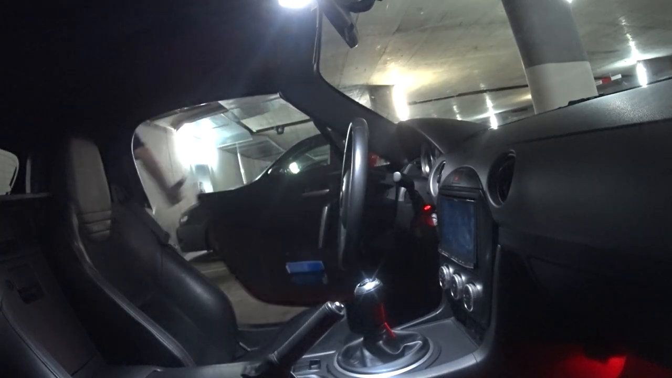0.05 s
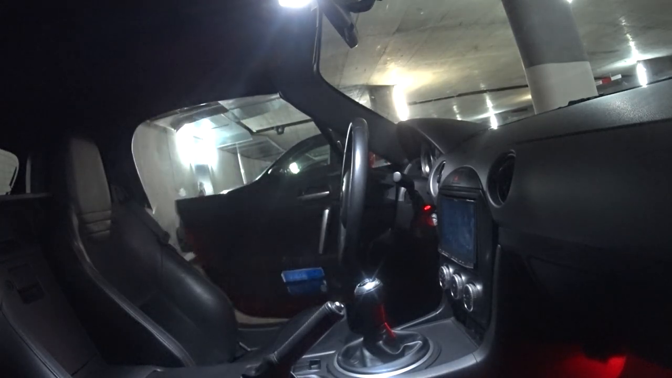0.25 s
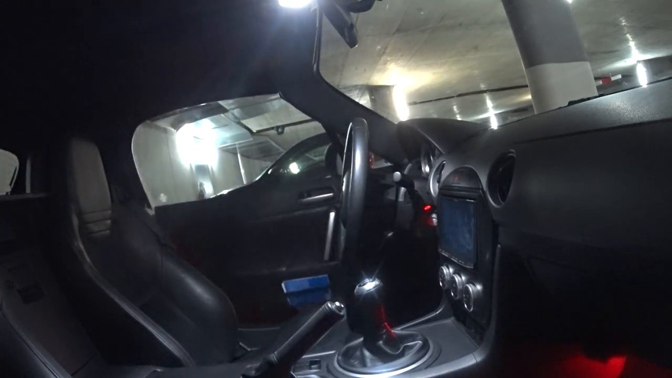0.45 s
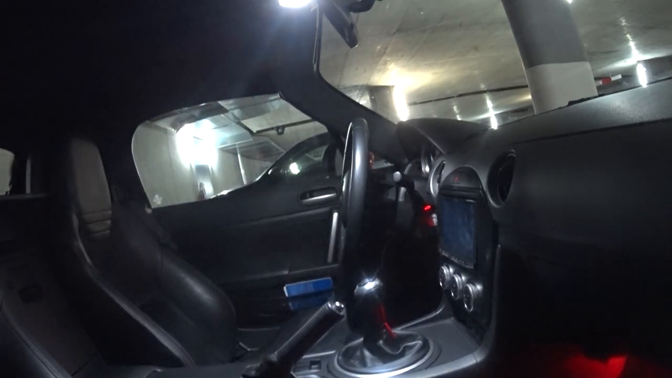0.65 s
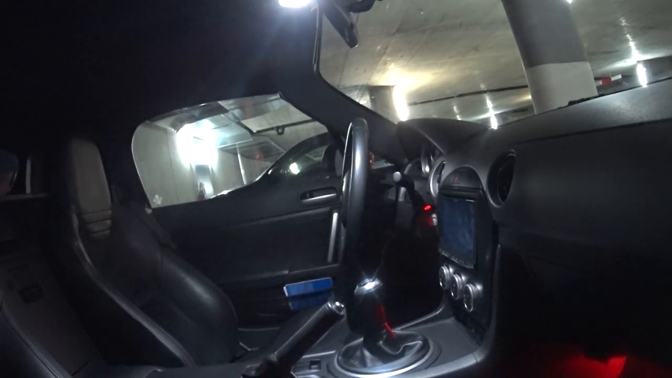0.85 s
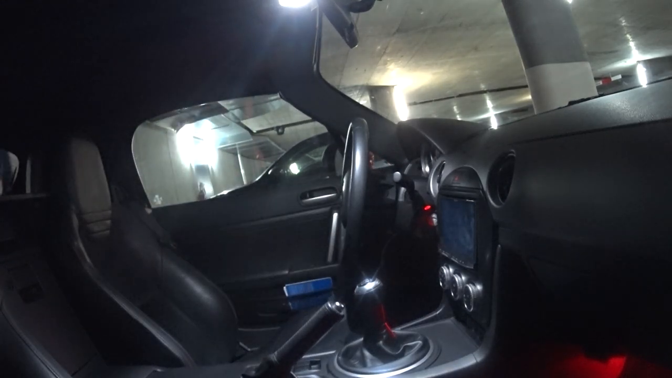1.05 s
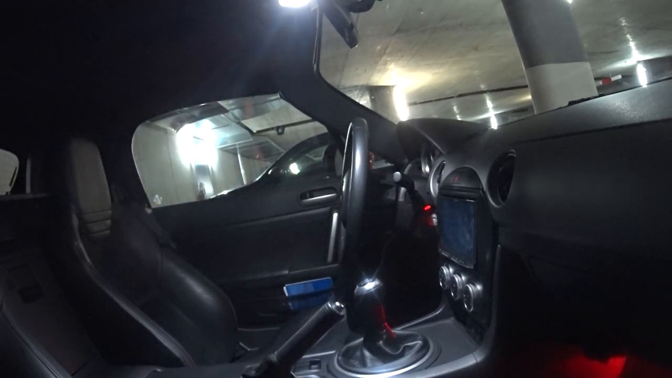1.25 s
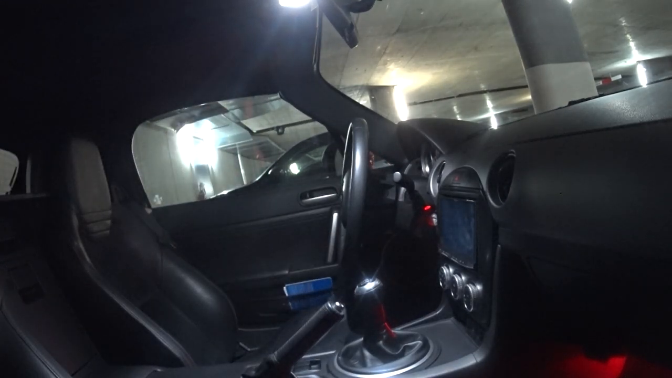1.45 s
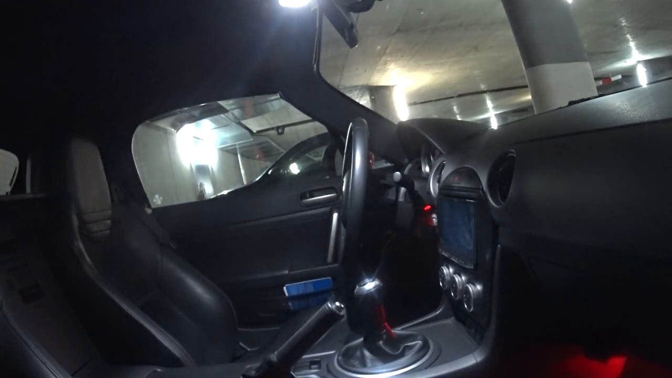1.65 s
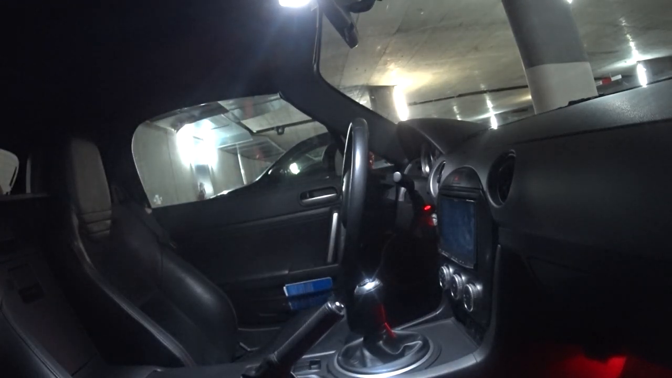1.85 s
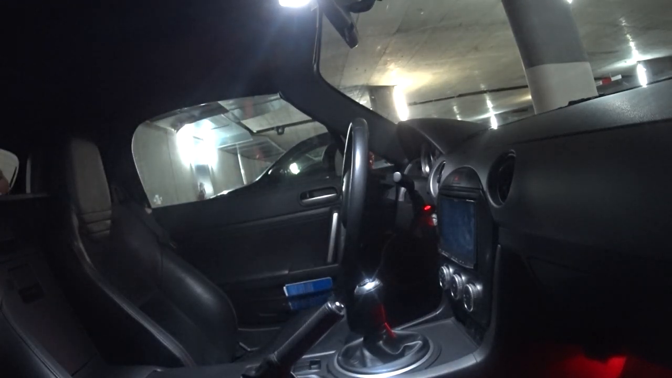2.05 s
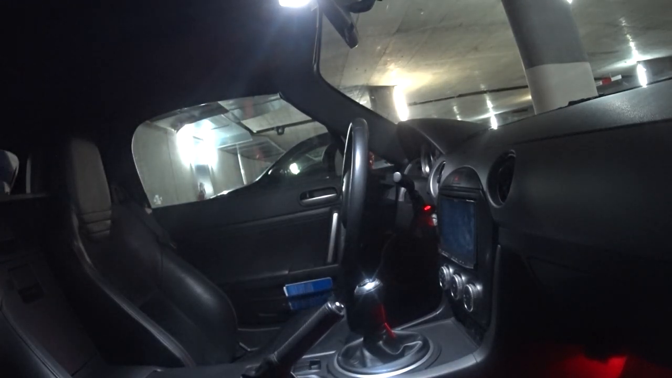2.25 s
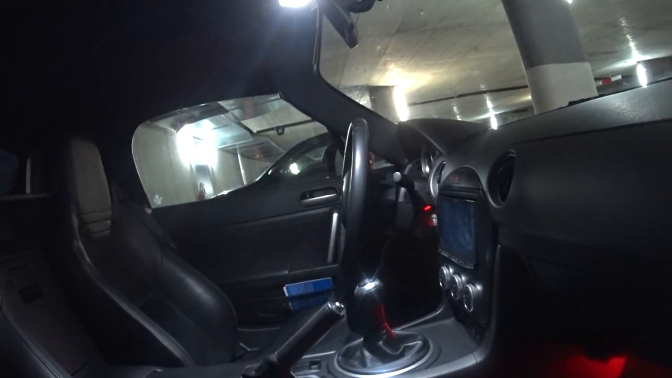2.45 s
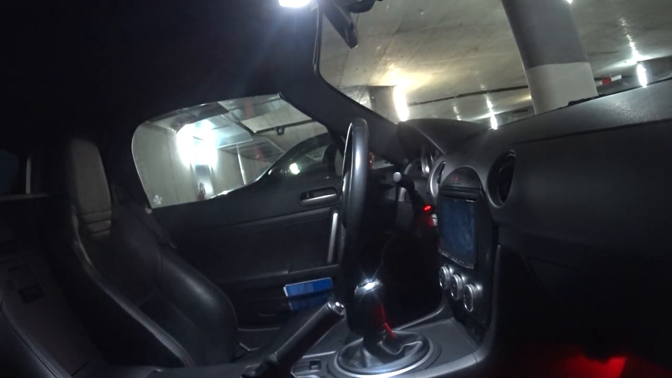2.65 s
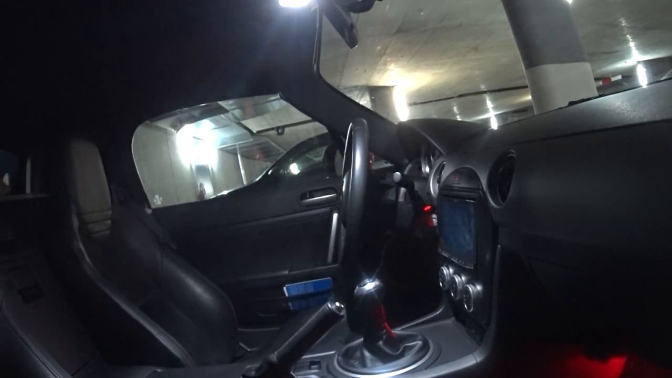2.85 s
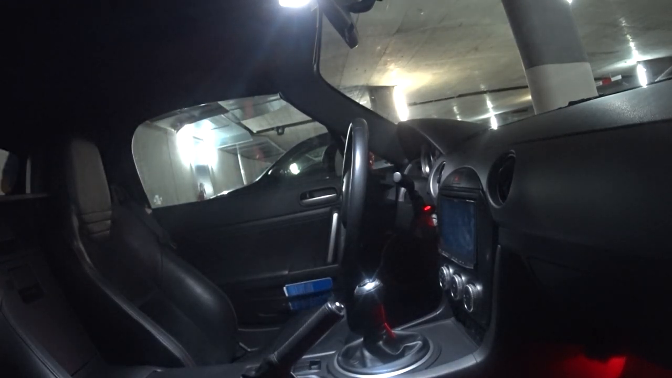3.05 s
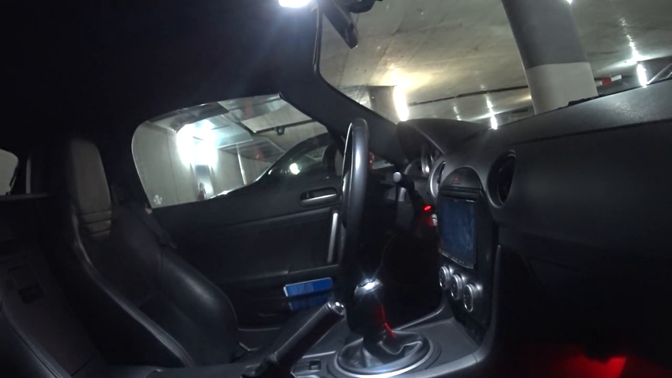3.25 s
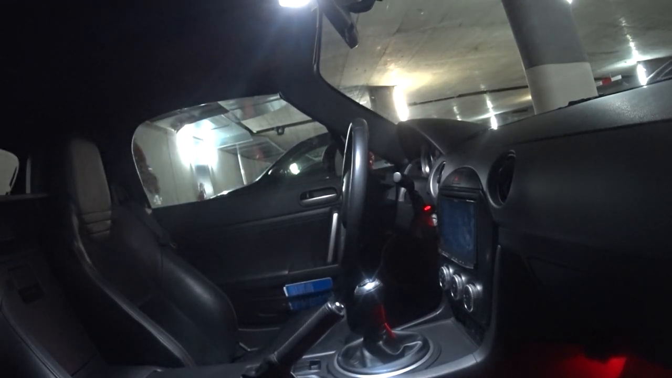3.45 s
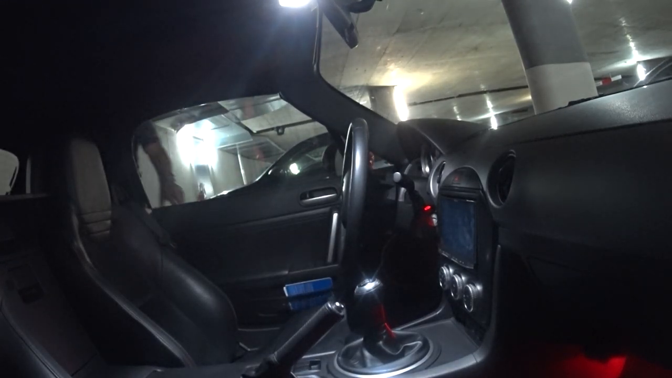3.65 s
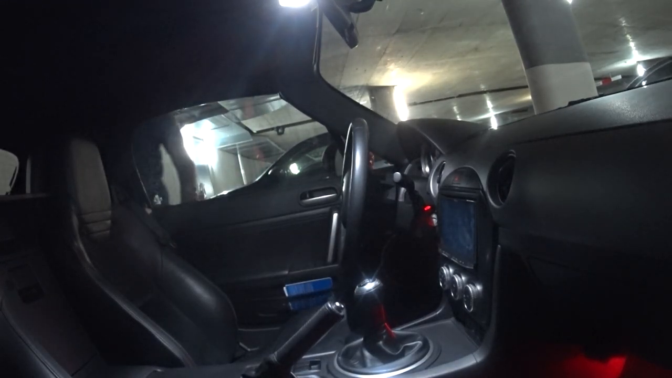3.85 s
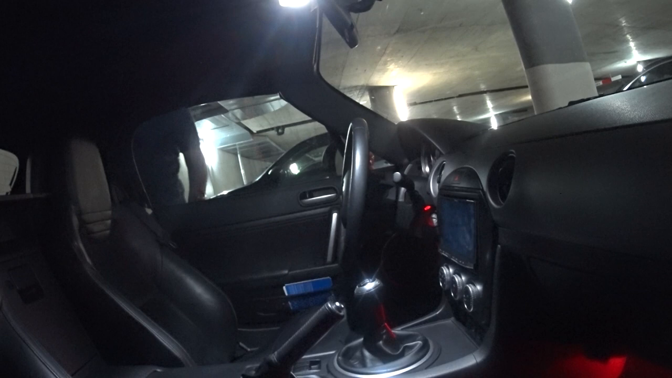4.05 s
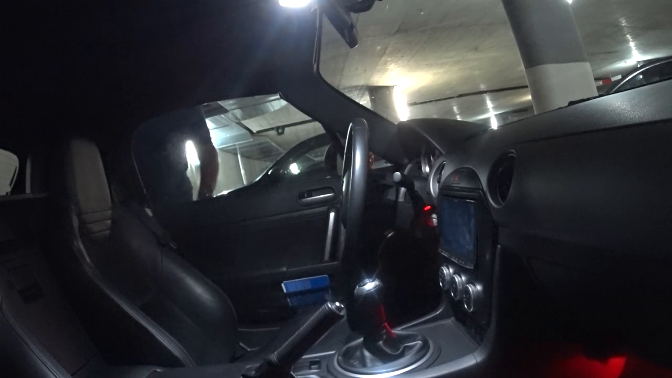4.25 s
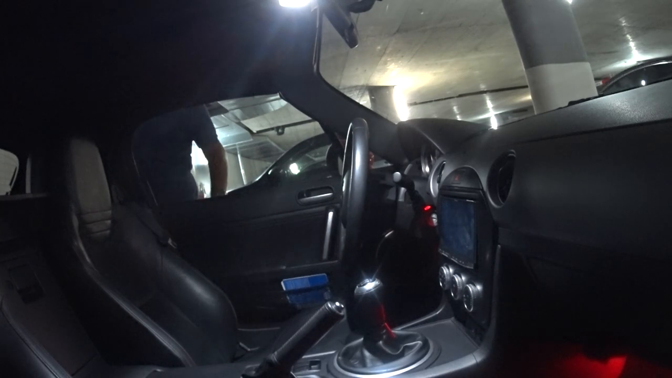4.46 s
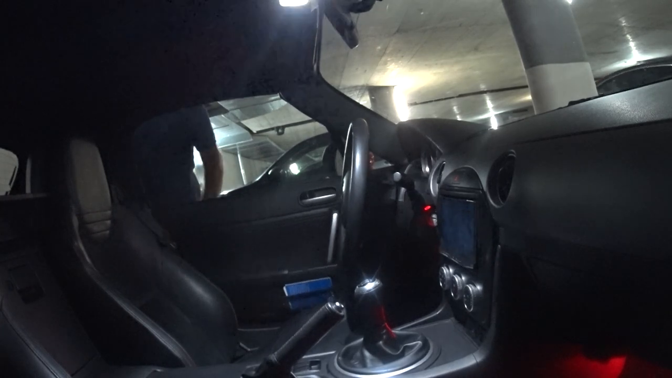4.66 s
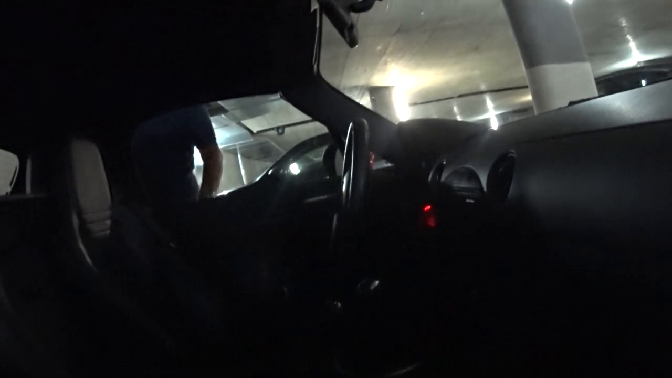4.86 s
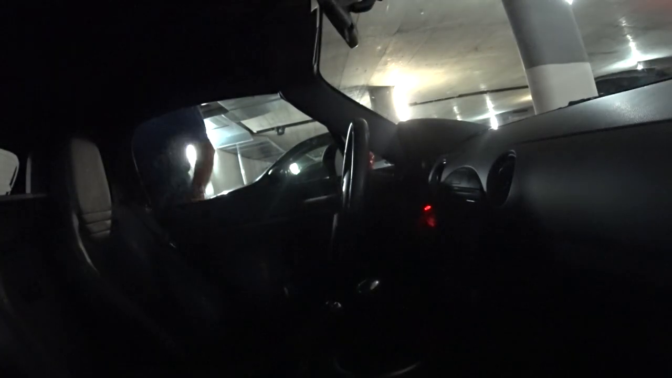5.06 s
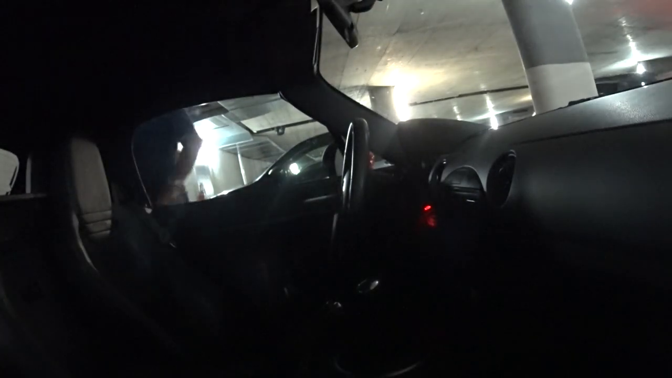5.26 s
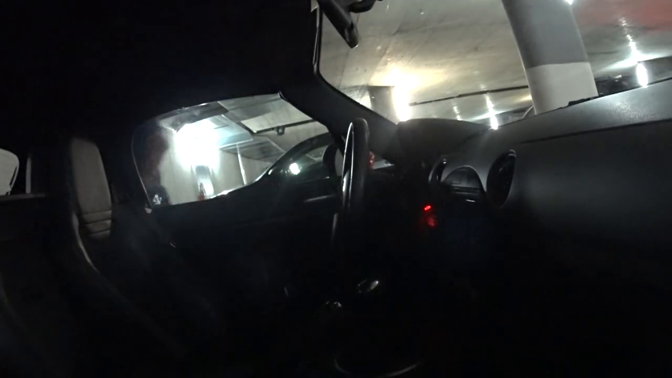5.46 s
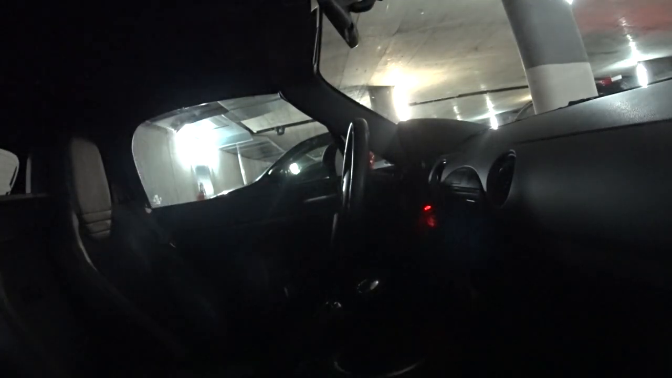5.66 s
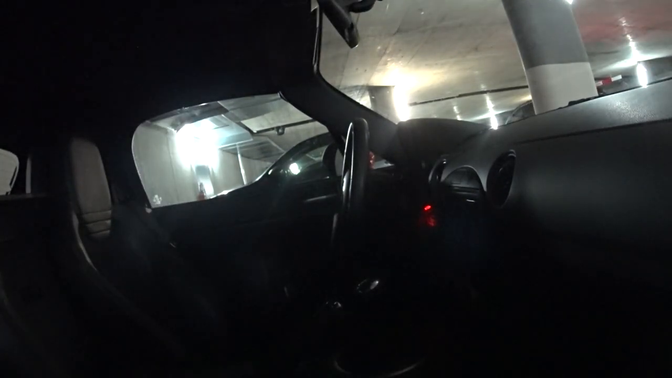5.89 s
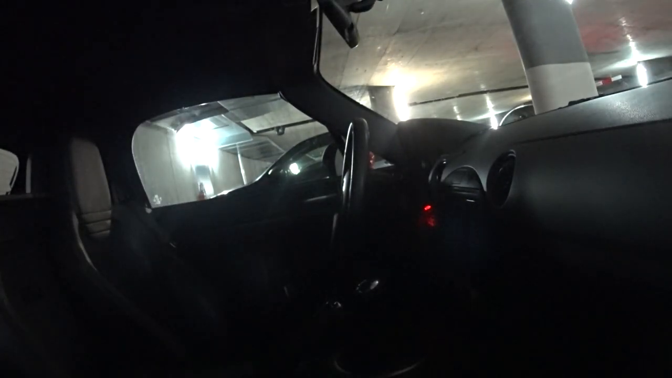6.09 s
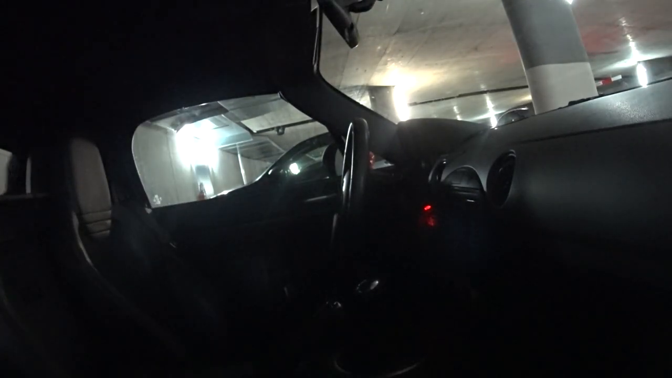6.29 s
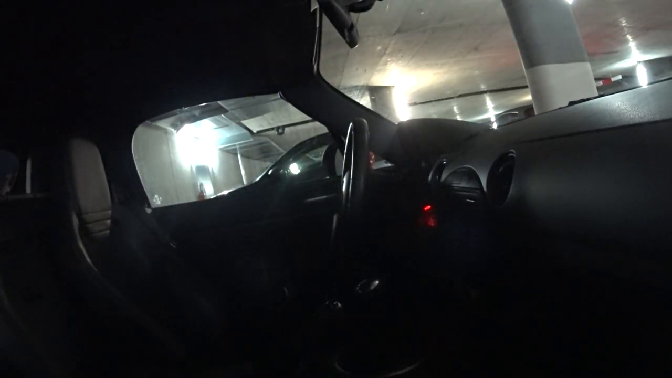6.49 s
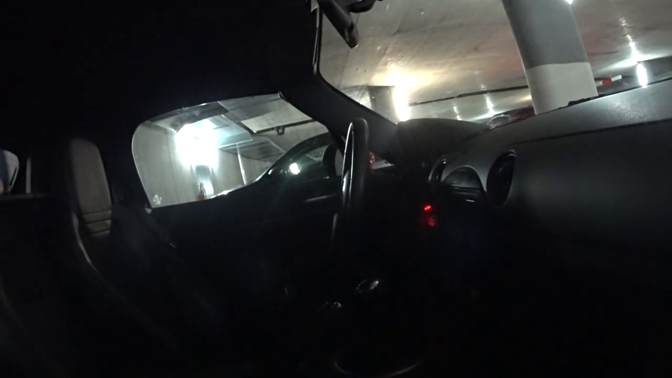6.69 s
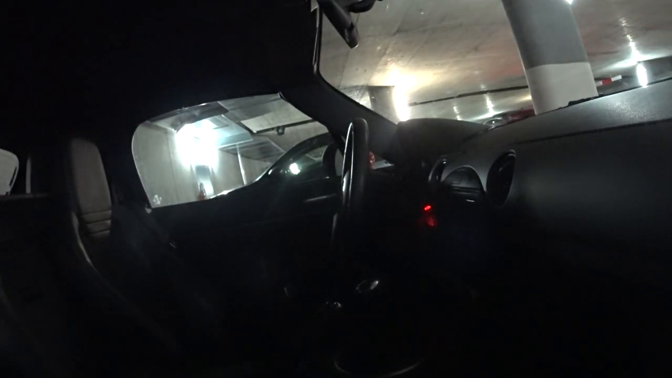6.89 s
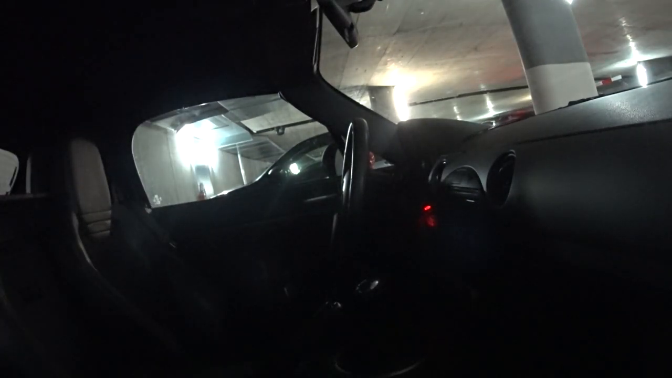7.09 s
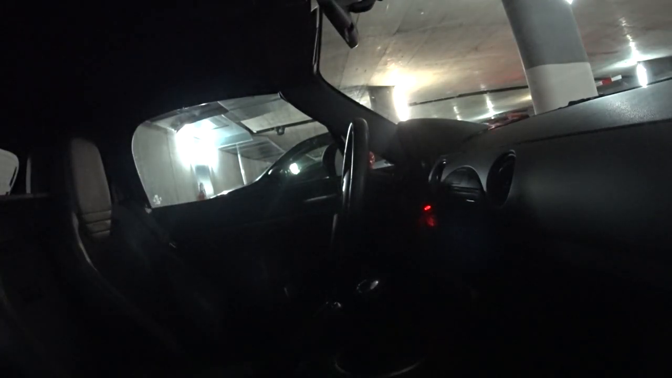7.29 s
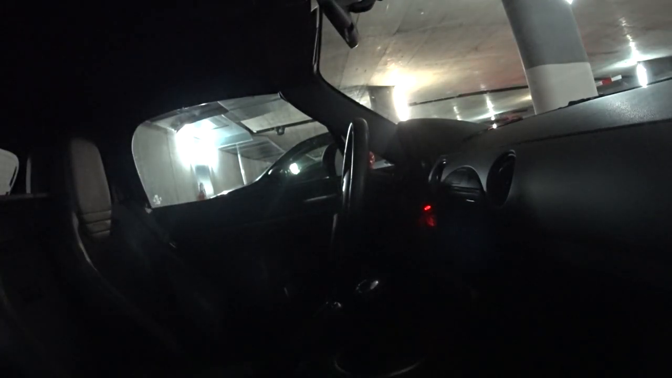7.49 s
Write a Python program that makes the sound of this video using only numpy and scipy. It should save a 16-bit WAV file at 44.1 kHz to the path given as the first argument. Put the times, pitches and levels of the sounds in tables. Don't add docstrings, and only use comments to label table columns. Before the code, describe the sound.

A soft knock of door panels leads to a hard, bassy car door slam, echoing briefly in the car park. Muffled rumble and a slow engine continue with tiny trim clicks. The latch snaps, panels clunk, and a second solid slam shuts the space tighter. Later come a cluster of dull outside knocks and lighter taps. Close cabin perspective, small microphone, slams slightly squashed.

```python
import sys
import numpy as np
from scipy import signal
from scipy.fft import rfft, irfft, next_fast_len
from scipy.io import wavfile
from scipy.ndimage import uniform_filter1d, minimum_filter1d

SR = 44100
rng = np.random.default_rng(int(sys.argv[2]) if len(sys.argv) > 2 else 0)


def amplitude_ratio(level_db):
    exponent = np.asarray(level_db, float) / 20
    return 10 ** exponent


def transcribe(signal):
    frames = np.atleast_2d(signal).T
    limited = np.clip(frames, -1, 1)
    pcm = np.round(limited * 32767).astype(np.int16)
    wavfile.write(sys.argv[1], SR, pcm)


N = 332073
TIME = np.arange(N) / SR

SLAM_STARTS = (.5, 4.64)
# start in seconds, then shell, skin, latch and rattle levels in dB.
BLOWS = [(0.526, -23, -13, -2, -10), (0.535, -16, -2.5, 0, -7), (0.548, 9.5, 12.5, 7, -6.5),
         (0.569, -12, 5.5, -1, -14), (0.591, -5, 0, -9, -14), (0.611, -22, -16, -7, -26),
         (0.626, -7, 4.5, -7, -25), (0.645, -5, -2.5, -19, -34), (0.693, -20, -9, -36, -35),
         (0.756, -26, -22, -38, -43), (0.802, -31, -38, -41, -43), (4.669, -18, -3, 2, -12),
         (4.676, -1, -21.5, -1.5, -1), (4.687, -7, 9, 0.5, -32), (4.707, 2, 4, -5, -12.5),
         (4.726, 8, 7, -19, -40), (4.758, 1, 2, -36, -44), (4.786, -8, -4, -46, -51),
         (4.819, -10.5, -13, -38, -50), (4.862, -21.5, -27, -48, -38)]
# frequency in Hz, level in dB, t60 in seconds.
SHELL_MODES = [
    [(26.9, -22, 0.8), (44.7, -10, 0.9), (60.1, -2, 0.35), (73, -3, 0.4), (96, -1, 0.3), (132, -9, 0.1)],
    [(28, -14, 0.6), (47.4, -11, 0.58), (67.9, -12, 0.91), (80.2, -5, 0.24), (99, -3, 0.25), (136, -19, 0.3)],
]
# frequency in Hz, level in dB, t60 in seconds.
SKIN_MODES = [(175, -9, 0.045), (200, -7.5, 0.046), (237, -5, 0.046), (296, -2, 0.055), (371.5, -6, 0.09),
              (410, -5, 0.055), (525, -2.5, 0.027), (590, -21, 0.052)]
# frequency in Hz, level in dB, t60 in seconds.
LATCH_MODES = [(770, -2.5, 0.0076), (1000, -10, 0.011), (1515, -11.5, 0.015), (1790, 1, 0.0034),
               (2400, -11.5, 0.0048), (2950, -24, 0.0033)]
# frequency in Hz, level in dB, t60 in seconds.
RATTLE_MODES = [(3360, -1.5, 0.0023), (4400, -11.5, 0.0045), (5770, -2.5, 0.0011), (7600, -3, 0.00069),
                (8600, -14, 0.0019)]
# start in seconds, level in dB, frequency in Hz, t60 in seconds.
DOOR_KNOCKS = [(.039, -17, 320, 0.06), (.036, -17, 520, 0.06), (.049, -18, 560, 0.07),
               (.042, -21, 700, .06), (.05, -23, 380, .1), (0.0072, -27, 300, .15),
               (0.284, -26, 296, 0.051), (.538, -11, 245, 0.12), (0.653, -17.5, 380, 0.12),
               (.645, -19, 578, 0.081), (3.964, -17.5, 284, 0.11), (3.968, -16, 414, 0.045),
               (3, -31, 200, 0.042), (4.011, -21, 188, 0.21), (4.0215, -19, 188, .18),
               (4.3, -24, 133, 0.028), (3.978, -26, 110, .04), (4.02, -25, 53.4, 0.18),
               (4.23, -28, 194, 0.17), (4.312, -24.5, 215, 0.1), (4.346, -10, 263, 0.064),
               (4.345, -17.5, 750, 0.073), (4.359, -22, 370, .05), (.527, -13.5, 770, 0.049),
               (4.669, -18, 783, 0.038), (4.682, -14.5, 345, 0.25), (4.697, -18.5, 222, 0.35),
               (4.725, -12, 85, 0.15), (4.79, -17.5, 30, 0.7), (.72, -27, 27, 0.9), (.77, -25, 60, 0.4),
               (.553, -9, 65, .28), (.616, -11, 90, .15), (.627, -9, 90, .13), (.705, -21, 85, .2),
               (4.695, -12, 85, 0.11), (4.755, -13, 60, .15), (4.8, -19, 120, .15), (4.9, -26, 110, .15),
               (.556, -18, 530, 0.054), (.58, -22, 340, 0.055), (4.715, -16, 290, .1),
               (4.35, -26, 520, 0.065), (4.03, -21, 270, .08), (.84, -35, 50, 0.36), (1.1, -35, 59, .3)]
# start in seconds, level in dB, frequency in Hz, t60 in seconds.
OUTSIDE_KNOCKS = [(5.753, -22.5, 270, 0.073), (5.76, -32, 722, 0.07), (5.778, -24, 248, 0.06),
                  (5.786, -20, 94, .05), (5.794, -19.5, 136, 0.33), (5.795, -13, 439, .11),
                  (5.797, -22.5, 983, 0.067), (5.805, -21, 300, .07), (5.826, -20, 330, .08),
                  (5.797, -26, 56, .17), (5.808, -15.5, 655, 0.065), (5.813, -13.5, 198, 0.11),
                  (5.819, -14, 450, 0.057), (5.836, -14.5, 200, 0.047), (5.85, -23, 435, 0.093),
                  (5.832, -25, 138, 0.29), (5.889, -32, 134.3, 0.21), (5.797, -29.5, 1780, .1),
                  (5.822, -20, 600, 0.051), (5.917, -27, 648, 0.09), (5.895, -29, 680, .06),
                  (6.421, -18, 265, 0.1), (6.428, -24, 360, .09), (6.445, -25.5, 223.4, 0.066),
                  (6.497, -35, 640, .04), (6.432, -33, 1600, .16), (6.44, -29, 598, .06),
                  (6.597, -41, 1606, .12), (6.61, -37, 1070, .1), (6.65, -31, 270, 0.053),
                  (6.584, -25, 237, 0.054), (6.612, -26, 266, 0.073), (6.675, -31, 272, 0.06),
                  (6.785, -35, 651, 0.13), (6.81, -33.5, 464, 0.15)]
# start in seconds, level in dB, frequency in Hz, t60 in seconds.
JOLTS = [(.53, -16, 110, .04), (.598, -13, 64, .04), (.662, -8, 40, .14), (.689, -13, 85, .04),
         (4.677, -21, 110.3, .04), (4.766, -8, 90, .06), (4.86, -19, 38, .1), (5.792, -13, 47.96, .07),
         (5.814, -14, 130, .04)]
# start in seconds, level in dB, low Hz, top Hz, decay in seconds.
CLICKS = [(.592, -28.5, 8800, 9200, 0.021), (0.628, -26.5, 4500, 4900, 0.0081),
          (4.678, -15, 4200, 4620, 0.0046), (1.82, -55, 5630, 6250, 0.03), (3.962, -23, 1370, 1940, 0.023),
          (3.963, -24.5, 2500, 9100, 0.0053), (3.975, -32, 2400, 9000, 0.013),
          (4.275, -37, 4000, 10000, .008), (4.311, -22, 2000, 10800, 0.005),
          (4.31, -26.5, 1210, 1960, 0.021), (1.657, -33, 550, 730, .015), (2.746, -36, 550, 760, .012),
          (3.471, -35, 630, 820, .012), (3.06, -54, 3000, 10000, .01), (4.676, -28, 1300, 1860, .012),
          (4.673, -34, 8000, 11200, 0.011),
          (.07, -33.5, 260, 335, 0.14), (.63, -26, 900, 2300, 0.013), (.65, -28, 990, 2200, 0.0095),
        (3.962, -21.5, 500, 1020, 0.012), (3.964, -35, 2800, 3700, 0.014), (4.345, -25, 400, 1000, 0.017),
        (4.715, -28, 2000, 7000, .005), (4.755, -22, 520, 1000, 0.011), (4.778, -24, 330, 517, .015),
        (4.84, -30, 280, 540, 0.029), (5.76, -29.5, 340, 900, 0.022), (5.797, -32, 900, 2800, 0.018),
        (5.82, -32, 600, 2100, .02), (4.668, -25, 560, 940, 0.0073), (6.432, -39, 920, 2500, .015),
        (6.592, -43, 1400, 2400, 0.0072), (5.845, -42, 2150, 2800, .012), (6.455, -44, 1500, 2300, .01),
        (6.425, -26.5, 350, 890, 0.019), (6.444, -41, 1600, 2500, 0.0097), (7.3, -38.5, 450, 900, .01),
        (6.581, -32, 430, 800, 0.016), (6.608, -42, 1000, 1700, .012), (6.655, -44, 1003, 2086, .02),
        (6.424, -41.5, 1900, 2700, 0.025), (5.76, -37.5, 950, 2200, 0.027), (5.8, -23, 450, 1600, .04),
        (.693, -46, 2000, 10000, .01), (3.97, -29, 1300, 5500, .018), (4.347, -27, 350, 900, .02)]
# start in seconds, level in dB, low Hz, top Hz, decay in seconds.
SCRAPES = [(0.481, -30, 3000, 10500, 0.1), (2.27, -49, 1705, 5500, 0.04),
           (4.649, -35.5, 3020, 10450, 0.019), (5.796, -26, 1460, 2700, 0.016),
           (5.798, -19, 460, 1530, 0.021), (5.796, -47, 3300, 9600, 0.015), (5.83, -37, 1700, 2770, 0.0097),
           (6.426, -38, 1995, 2590, 0.014), (.033, -27, 300, 710, 0.019), (6.428, -33.5, 1480, 1660, 0.02),
           (6.583, -42, 1201, 1700, 0.03), (6.59, -47, 2400, 2500, 0.01), (6.814, -51, 4090, 9300, 0.041)]
# time in seconds, pitch in Hz, level in dB.
TYRE_SONG = [(0, 691, -43), (1.4, 520, -69), (1.55, 540, -48), (1.7, 665, -47), (2.2, 651, -51),
             (2.65, 626, -48.5), (3.1, 617.7, -42), (3.5, 615.2, -46), (3.9, 624, -46), (4.6, 619, -61),
             (6, 630.6, -51.5), (7.53, 642.2, -55)]
# time in seconds, pitch in Hz, level in dB.
TYRE_HUM = [(0, 190.6, -50), (1.2, 200, -58), (1.55, 207.3, -45), (2, 214, -43), (2.4, 205, -46.5),
            (2.85, 205, -45), (3.15, 189.9, -46), (3.7, 200, -43), (4.4, 205.2, -40.5), (5, 200, -50),
            (5.7, 197, -50.5), (6.5, 210, -50.5), (7.53, 207.7, -58)]
# time in seconds, firing rate in Hz, firing level in dB.
ENGINE = [(0, 62.3, -37), (.45, 54.7, -40), (1.1, 45.8, -45), (1.54, 41.25, -44.5), (1.88, 41.5, -39.5),
          (2.34, 39.9, -33), (2.95, 35.5, -30), (3.25, 36.23, -30.5), (3.72, 42.87, -32), (3.9, 49.6, -49),
          (4.03, 52.4, -31.5), (4.28, 57.9, -33.5), (4.46, 48.5, -26.5), (4.7, 43.4, -40),
          (5.4, 39.98, -37.5), (6.01, 40.1, -31), (6.7, 41.55, -44.5), (7.08, 41.75, -37)]
# time in seconds, change in dB.
FALTERS = [(1.3, -3), (2.098, -13), (3.02, -2.5), (3.139, -7), (3.4, -9), (3.62, -5), (4.32, -6),
           (5.25, -5), (6.9, -9)]
# time in seconds, length in seconds, level in dB.
LABOUR = [(2.128, 0.17, -42.5), (2.4, 0.1, -47), (2.579, 0.091, -43), (3.72, .06, -50), (3.994, 0.055, -42),
          (6.444, .1, -51)]
# time in seconds, nearness in dB.
NEARNESS = [(0, -2.5), (.5, -3.5), (1.03, -7), (1.36, -6), (1.76, -1.5), (2.37, 1.5), (3.1, 0.5), (3.6, 1),
            (4.4, 3.5), (4.95, -1.5), (5.3, -4), (5.9, -3), (6.58, -2), (6.9, -4.5), (7.53, -3.5)]
# time in seconds, opening from 0 shut to 1 wide.
DOOR_OPENING = [(0, 1), (.29, 0.76), (.5, 0.55), (.56, 0.13), (3.955, 0.18), (4.0, 0.54), (4.2, 0.7),
                (4.42, 0.81), (4.6, 0.84), (4.69, 0.5)]
# start in seconds, level in dB over the roar.
ECHOES = [
    (.6, 8),
    (4.75, 8.5),
    (5.83, 3.5),
    (6.45, -15),
]
# frequency in Hz, level in dB per Hz.
PARK_COLOUR = [(12, -31), (20, -6), (47, -14), (109, -19), (162, -13), (201, -8.5), (324, -10.5), (628, -9),
               (1320, -20.5), (1670, -22), (2490, -34), (3430, -38.5), (4020, -39.5), (10400, -49),
               (11300, -55.5), (14700, -91), (22000, -120)]
PARK_HZ = (110, 450, 1600, 5500)
NEAR_SHARE = (0.43, 1.03, 1.05, 0.5)
OPEN_DB = (11.8, 5.9, 12.7, 19.5)
SEAL_DB = (-6.5, -0.5, -3.5, -8)
FLICKER_DB = (2.5, 1.6, 1.0, .9)
ECHO_DB = (10.5, -15.5, -8, -43)
# frequency in Hz, width in Hz, level in dB.
CABIN = [(215, 11, -6.5), (424.3, 21.5, -2.5), (635, 40, -7.5), (1560, 39, -13), (3380, 240, -11.5),
         (6140, 310, -21)]
# frequency in Hz, width in Hz, level in dB, dB per dB of nearness.
CAR_BODY = [(1625, 120, -12.5, 2), (2090, 165, -15, 2.5), (3450, 300, -8, 2.2), (6000, 180, -15, 3)]
# frequency in Hz, likeness from 0 to 1.
LIKE_PARK = [(60, 0.98), (130, 0.97), (270, 1), (570, 0.82), (1210, 0.42), (2570, 0.31), (5460, 0.51),
             (11600, 0.84)]
# frequency in Hz, likeness from 0 to 1.
LIKE_SLAM = [(60, .62), (130, .42), (270, .62), (570, .66), (1210, .6), (2570, .5), (5460, .7),
             (11600, .72)]
# frequency in Hz, left minus right in dB.
BALANCE_DB = [(35, -4), (110, -6.5), (190, -5), (350, -3), (620, -4), (1120, -2.5), (2000, 1.5),
              (3600, 0.5), (6450, 0.5), (11600, -0.5)]
# frequency in Hz, lead of the left in radians.
LEAD = [(40, -.3), (85, .1), (180, .9), (430, 1.1), (1380, .9), (2500, .4), (4000, 0), (11000, -.1)]


def on_log(table, hz):
    table = np.array(table, float)
    return np.interp(np.log(hz), np.log(table[:, 0]), table[:, 1])


def bands(values, hz):
    return on_log(list(zip(PARK_HZ, values)), hz)


def columns(table):
    s, *rest = np.transpose(table)
    return [np.interp(TIME, s, column) for column in rest]


def walk(rate):
    hold = int(SR / rate)
    steps = np.repeat(rng.standard_normal(N // 1000), hold)[:N]
    return uniform_filter1d(uniform_filter1d(steps, hold), hold)


def ring(x, hz, t60):
    radius = 10 ** (-3 / (t60 * SR))
    angle = 2 * np.pi * hz / SR
    return signal.lfilter([0, radius * np.sin(angle)], [1, -2 * radius * np.cos(angle), radius ** 2], x)


def resonance(x, hz, width):
    return signal.lfilter(*signal.iirpeak(hz, hz / width, fs=SR), x)


def slams():
    out, span = np.zeros((2, N)), np.arange(6 * SR // 5) / SR
    shell_lag_s, shove_db = 0.01195, -26.5
    shove_ports = (1, -0.2)
    for start, shell_modes in zip(SLAM_STARTS, SHELL_MODES):
        bursts = amplitude_ratio(1.8 + 1.6 * rng.exponential(size=(2, len(span))))
        hail = rng.standard_normal((2, len(span))) * bursts
        rows = np.array([row for row in BLOWS if 0 < row[0] - start < 1])
        after = np.maximum(span + start - rows[:, :1], 0)
        decay_s = 0.0084 + 0.49 * np.maximum(rows[:, :1] - start - 0.2, 0)
        shudder = np.minimum(after / 0.0042, 1) * np.exp(-after / decay_s)
        shudder += 0.056 * np.minimum(after / 0.019, 1) * np.exp(-after / 0.058)
        parts = ((shell_modes, -40), (SKIN_MODES, -40), (LATCH_MODES, -30), (RATTLE_MODES, -23))
        for column, (modes, part_db) in enumerate(parts, 1):
            push = amplitude_ratio(rows[:, column] + part_db) @ shudder
            force = push * hail
            if modes is shell_modes:
                shove = np.outer(shove_ports, push * amplitude_ratio(shove_db))
                force = np.roll(amplitude_ratio(-9) * force + shove, int(shell_lag_s * SR), axis=1)
            rung = sum(amplitude_ratio(db) * ring(force, hz, t60) for hz, db, t60 in modes)
            out[:, int(start * SR):][:, :len(span)] += rung
    return out


def knocks(table):
    out, brief = np.zeros((2, N + SR)), np.arange(SR // 8) / SR
    grains = rng.standard_normal((len(table), 2, len(brief)))
    for (s, db, hz, t60), grain in zip(table, grains):
        at = int(s * SR)
        cycles = 2.09 * (hz / 300) ** 0.64
        turn = np.arange(int(min(t60 + 0.04, 0.9) * SR)) * hz / SR
        swell = np.sin(np.pi * np.minimum(turn / cycles, 1)) ** 2
        push = np.sin(2 * np.pi * turn) * swell * 4 * hz / SR / cycles
        main = ring(push, hz, t60) + 0.26 * ring(push, hz * 1.22, t60 * 0.6)
        neighbour = 0.62 * ring(push, hz * 0.9, t60 * 0.73)
        out[:, at:at + len(turn)] += amplitude_ratio(db + 4.5) * np.array([main, neighbour])
        buzz = amplitude_ratio(-15) * np.sqrt(hz / SR) / 10 * np.exp(-brief / (0.29 * t60)) * grain
        buzz = ring(buzz, hz * 1.27, t60 * 0.27) * (1 - brief / brief[-1])
        out[:, at:at + len(brief)] += amplitude_ratio(db + 4) * buzz
    return out[:, :N]


def jolts():
    return np.outer((0.18, 1), knocks(JOLTS)[0])


def clicks():
    out, span = np.zeros((2, N + SR)), np.arange(SR // 4) / SR
    rows = [(*row, 0.0026) for row in CLICKS]
    rows += [(*row, 0.67 * row[-1]) for row in SCRAPES]
    noises = rng.standard_normal((len(rows), 2, len(span)))
    for (s, db, low_hz, top_hz, decay, rise), noise in zip(rows, noises):
        at = int(s * SR)
        sos = signal.butter(3, [low_hz, top_hz], "band", fs=SR, output="sos")
        burst = signal.sosfilt(sos, noise)
        shape = np.minimum(span / rise, 1) * np.exp(-span / decay)
        out[:, at:at + len(span)] += amplitude_ratio(db) * shape * burst / burst.std()
    return out[:, :N]


def tyres():
    song_hz, song_db = columns(TYRE_SONG)
    hum_hz, hum_db = columns(TYRE_HUM)
    song = np.sin(2 * np.pi * np.cumsum(song_hz * (1 + 0.016 * walk(22))) / SR)
    hum = np.sin(2 * np.pi * np.cumsum(hum_hz * (1 + 0.035 * walk(12))) / SR)
    song_flutter = np.array([walk(40), walk(40)])
    hum_flutter = np.array([walk(25), walk(32)])
    song = amplitude_ratio(song_db) * (0.92 + 0.45 * song_flutter) * song
    hum = amplitude_ratio(hum_db) * (0.55 + 0.5 * hum_flutter) * hum
    return 2 * (song + hum)


def engine():
    hz, first_db = columns(ENGINE)
    first_db = first_db + sum(db * np.exp(-((TIME - s) / 0.062) ** 2) for s, db in FALTERS)
    boom = sum(amplitude_ratio(db) * np.exp(-((TIME - s) / length) ** 4) for s, length, db in LABOUR)
    second = amplitude_ratio(first_db - 21.5) + boom
    turn = 2 * np.pi * np.cumsum(hz * (1 + 0.0099 * walk(6.68))) / SR
    first_order = amplitude_ratio(first_db + 0.74 * walk(5.8)) * np.sin(turn)
    second_order = second * amplitude_ratio(2.4 * walk(7.8)) * np.sin(2 * turn)
    return np.sqrt(2) * (first_order + second_order) * np.ones((2, 1))


def fan():
    shaft_hz = 28.4
    turn = 2 * np.pi * np.cumsum(shaft_hz * (1 + 0.0121 * walk(2.62))) / SR
    once = amplitude_ratio(-58 + 0.83 * walk(5)) * np.sin(turn)
    twice = amplitude_ratio(-54.5 + walk(3.8)) * np.sin(2 * turn)
    settling = amplitude_ratio(14 * np.exp(-TIME / 0.18))
    return np.sqrt(2) * (once + twice) * settling * np.ones((2, 1))


def car_park():
    out, (near_db,), (door,) = np.zeros((2, N)), columns(NEARNESS), columns(DOOR_OPENING)
    echoes = np.array(ECHOES)
    after = np.maximum(TIME - echoes[:, :1], 0)
    echo = amplitude_ratio(echoes[:, 1]) @ (np.minimum(after / 0.037, 1) * np.exp(-after / 0.29))
    near, door, echo = near_db[::64], door[::64], echo[::64]
    sealed = TIME[::64] > DOOR_OPENING[-1][0]
    for hz in 22 * 2 ** np.arange(0, 9.1, 1 / 3):
        swell_db = bands(NEAR_SHARE, hz) * near + bands(OPEN_DB, hz) * door + bands(SEAL_DB, hz) * sealed
        swell = np.repeat(amplitude_ratio(swell_db) + amplitude_ratio(bands(ECHO_DB, hz)) * echo, 64)[:N]
        sos = signal.butter(2, [hz / 2 ** (1 / 6), hz * 2 ** (1 / 6)], "band", fs=SR, output="sos")
        band = signal.sosfilt(sos, rng.standard_normal((2, N)))
        out += band * swell * amplitude_ratio(on_log(PARK_COLOUR, hz) + bands(FLICKER_DB, hz) * walk(9))
    for hz, width, db in CABIN:
        out += amplitude_ratio(db) * resonance(out, hz, width)
    for hz, width, db, share in CAR_BODY:
        out += amplitude_ratio(db + share * near_db) * resonance(out, hz, width)
    out -= 0.45 * resonance(out, 1300, 115)
    usual_power = np.median(uniform_filter1d(out[0] ** 2, SR // 4))
    return out * amplitude_ratio(-33.5) / np.sqrt(usual_power)


def ports(pair, likeness):
    size = next_fast_len(N)
    hz = np.maximum(np.fft.rfftfreq(size, 1 / SR), 1)
    one, other = rfft(pair, size)
    like = np.clip(on_log(likeness, hz), 0, 1)
    tilt = amplitude_ratio(on_log(BALANCE_DB, hz) / 2)
    left = (like * one + np.sqrt(1 - like ** 2) * other) * np.exp(1j * on_log(LEAD, hz))
    return irfft(np.array([left * tilt, one / tilt]), size)[:, :N]


def scene():
    close = ports(slams() + knocks(DOOR_KNOCKS + OUTSIDE_KNOCKS) + clicks(), LIKE_SLAM)
    park = ports(tyres() + engine() + fan() + car_park(), LIKE_PARK)
    return close + jolts() + park


def roll_off(x):
    return signal.sosfilt(signal.butter(12, 12180, fs=SR, output="sos"), x)


def record(dry):
    dry = signal.lfilter(*signal.butter(1, 14, "high", fs=SR), dry)
    envelope = -minimum_filter1d(-np.abs(dry).max(axis=0), size=600)
    envelope = uniform_filter1d(envelope, size=600)
    held = dry * np.minimum(1, (0.82 / envelope) ** 0.7)
    held += amplitude_ratio(-64) * np.diff(rng.standard_normal((2, N + 1)))
    rounded = np.tanh(held * 0.75) / 0.75
    top_cut = signal.ellip(10, 0.3, 80, 11050, fs=SR, output="sos")
    return roll_off(signal.sosfilt(top_cut, rounded))


dry = scene()
out = record(dry)
transcribe(out)
```